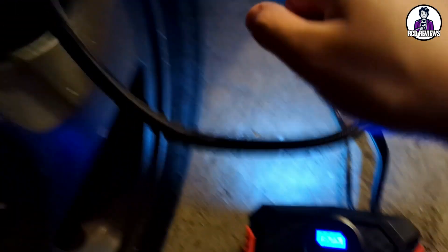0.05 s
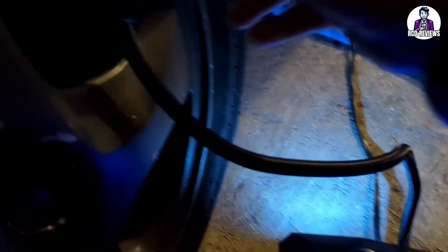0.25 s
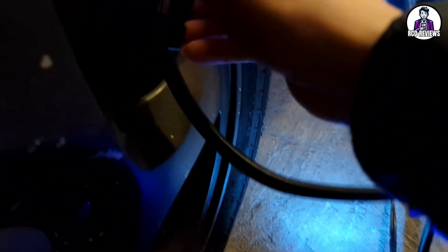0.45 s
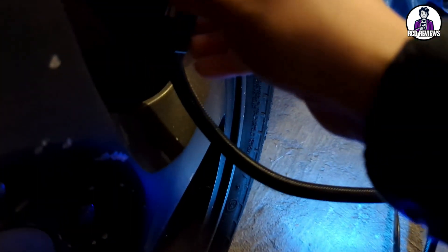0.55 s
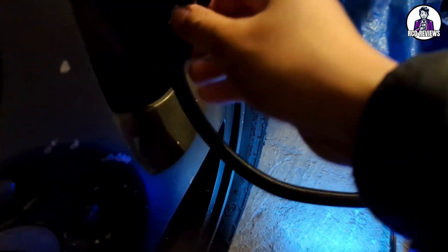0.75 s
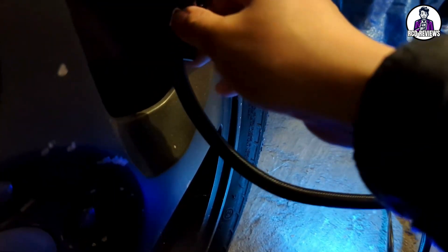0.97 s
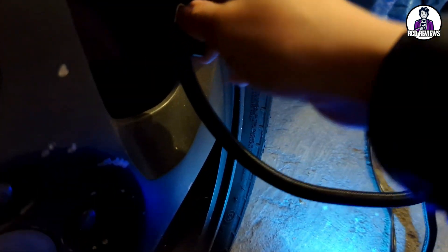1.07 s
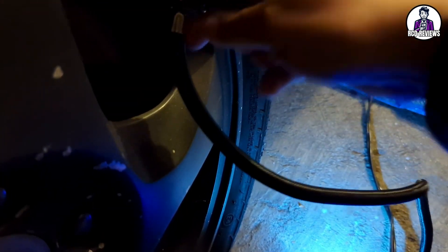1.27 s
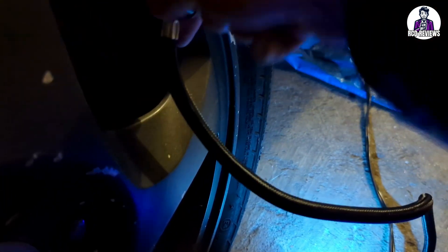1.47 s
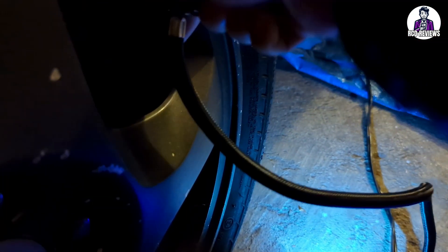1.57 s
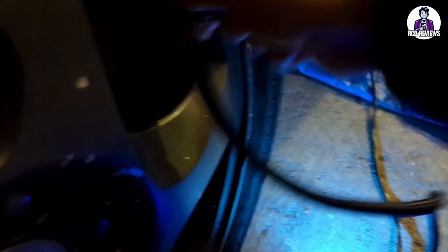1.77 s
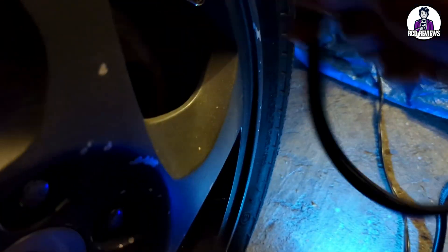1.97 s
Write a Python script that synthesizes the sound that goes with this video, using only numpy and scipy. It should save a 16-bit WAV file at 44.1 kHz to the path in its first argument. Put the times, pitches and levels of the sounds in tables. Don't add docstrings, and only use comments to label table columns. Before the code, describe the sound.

A sharp hiss of air escaping a tire valve for half a second, then small metallic clicks

```python
import sys
import numpy as np
from scipy import signal
from scipy.fft import rfft, irfft, next_fast_len
from scipy.io import wavfile
from scipy.ndimage import uniform_filter1d, map_coordinates

SR = 44100
rng = np.random.default_rng(int(sys.argv[2]) if len(sys.argv) > 2 else 0)


def attenuation_scalar(level_db):
    decades = np.asarray(level_db, float) / 20
    return 10 ** decades


def to_wav(s):
    ch = np.atleast_2d(s).T
    pcm = np.round(np.clip(ch, -1, 1) * 32767)
    wavfile.write(sys.argv[1], SR, pcm.astype(np.int16))


N = 89037
T = np.arange(N) / SR
HIT_T = np.arange(SR // 2) / SR


def unit(x):
    return x / np.sqrt(np.mean(x ** 2) + 1e-20)


def along(points, hz):
    f, v = np.transpose(points)
    return np.interp(np.log(hz + 1), np.log(f + 1), v)


def humps(table, hz):
    return sum(db / (1 + (2 * (hz - c) / w) ** 2) for c, w, db in table)


def wobble(rate):
    return map_coordinates(rng.standard_normal(int(N * rate / SR) + 4), [T * rate])


def filtered(x, response):
    m = next_fast_len(N + 8192)
    return irfft(rfft(x, m) * response(np.fft.rfftfreq(m, 1 / SR)), m)[..., :N]


def bandpass(x, low_hz, high_hz):
    sos = signal.butter(N=2, Wn=[low_hz, high_hz], btype="bandpass", fs=SR, output="sos")
    return signal.sosfilt(sos, x)


def patchy(depth_db, channels):
    z = signal.stft(rng.standard_normal((channels, N)), nperseg=256)[2]
    field = uniform_filter1d(rng.standard_normal(z.shape), 4, 1)
    field = uniform_filter1d(field, 10, 2)
    return signal.istft(z * attenuation_scalar(depth_db * unit(field)), nperseg=256)[1][:, :N]


def pair(left_db):
    return attenuation_scalar(np.array([[left_db / 2], [-left_db / 2]]))


def add_hit(out, s, sound):
    out[:, round(s * SR):][:, :len(HIT_T)] += sound


def turbulent_air():
    right_lag_s, alike = 0.00012, 0.38
    near, other = patchy(2.2, channels=2)
    late = filtered(near, lambda hz: np.exp(-2j * np.pi * hz * right_lag_s))
    return np.array([near, alike * late + np.sqrt(1 - alike ** 2) * other])


def behind_hand(right):
    # (frequency [Hz], width [Hz], gain [dB])
    far_side = [(4100, 200, -9), (6400, 400, 3), (7600, 800, -3), (8600, 1000, -6), (9800, 300, -3),
                (10600, 700, 2), (11700, 600, -4), (13200, 900, 1)]
    # (frequency [Hz], share of the shading, below 0 it strengthens)
    shadow = [(500, -.3), (1300, -.2), (2400, .2), (4400, .45), (8000, 1), (15000, .95)]
    # (time [s], shading of the right port [dB])
    hand = [
        (1.23, 7),
        (1.36, 7),
        (1.4, 5.5),
        (1.47, 6),
        (1.5, 10),
        (1.68, 12),
        (1.73, 11),
        (1.77, 4),
    ]
    open_db, shaded_db = 5, 13
    right = filtered(right, lambda hz: attenuation_scalar(humps(far_side, hz)))
    open_side = filtered(right, lambda hz: attenuation_scalar(-open_db * along(shadow, hz)))
    shaded = filtered(right, lambda hz: attenuation_scalar(-shaded_db * along(shadow, hz)))
    passed = attenuation_scalar(-np.interp(T, *np.transpose(hand)))
    share = (passed - attenuation_scalar(-shaded_db)) / (attenuation_scalar(-open_db) - attenuation_scalar(-shaded_db))
    share = np.clip(share, 0, 1.3)
    return share * open_side + (1 - share) * shaded


def jet():
    # (time [s], flow [dB], gap width [dB])
    leak = [
        (1.224, -70, 7),
        (1.234, -25.5, -4.5),
        (1.265, -26.5, -37),
        (1.4, -26, -21),
        (1.55, -27.5, -9),
        (1.7, -25.5, -18),
        (1.767, -29.5, -1.5),
        (1.798, -46, 5),
        (1.83, -88, -20),
    ]
    # (frequency [Hz], level per Hz [dB])
    hiss = [(180, -43), (300, -33.5), (1210, -23.5), (3840, -11), (4610, -7), (8510, 0), (10000, -3),
            (11800, 0.5), (15700, -4.5)]
    # (frequency [Hz], width [Hz], gain [dB])
    stem = [(950, 108, 8), (4097, 50, 15.5), (4450, 500, -10.5), (5800, 1140, -7), (6100, 200, 3),
            (8140, 100, 4), (8700, 390, 6), (10100, 230, -5), (11740, 270, 6)]
    # (frequency [Hz], level per Hz [dB])
    wide_gap = [(1500, -120), (2300, -9.5), (3750, 7.5), (4600, 4.5), (5600, 0.5), (6500, 9.5), (7200, -11),
                (8000, -120)]
    s, flow_db, gap_db = np.transpose(leak)
    flow = attenuation_scalar(np.interp(T, s, flow_db, left=-120, right=-120) + 6)
    air = turbulent_air()
    fine = unit(filtered(air, lambda hz: attenuation_scalar(along(hiss, hz) + humps(stem, hz))))
    wide = unit(filtered(air, lambda hz: attenuation_scalar(along(wide_gap, hz))))
    wide = wide * attenuation_scalar(np.interp(T, s, gap_db) - 8)
    left, right = (fine + wide) * flow
    return np.array([left, behind_hand(right)])


def ticks():
    # (time [s], level [dB], frequency [Hz], time to fall 60 dB [s], left over right [dB])
    touches = [
        (0.124, -48, 10800, 0.0072, 8),
        (1.02, -52.5, 11100, 0.0045, 14),
        (1.184, -50, 11300, 0.0068, 16),
        (1.886, -21.5, 11600, 0.0049, 6),
        (1.8983, -27.5, 11000, 0.015, -18),
        (1.9034, -22.5, 11800, 0.021, 5.5),
        (1.9075, -25, 10300, 0.013, 13.5),
        (1.9103, -34, 11000, 0.011, -10),
    ]
    out = np.zeros((2, N + SR))
    for s, db, hz, t60, left_db in touches:
        grit = rng.standard_normal((2, len(HIT_T))) * attenuation_scalar(-60 * HIT_T / t60)
        bright = bandpass(grit, 0.77 * hz, min(1.18 * hz, 20000))
        body = attenuation_scalar(-11) * bandpass(grit, 1200, 3800)
        add_hit(out, s, attenuation_scalar(db) * pair(left_db) * (bright + body))
    return out[:, :N]


def knocks():
    # (time [s], level [dB], frequency [Hz], time to fall 60 dB [s], left over right [dB])
    bumps = [(.003, -56.5, 483, 0.077, 1), (0.1, -52, 487, 0.044, 6), (0.397, -58, 1100, 0.028, -2),
             (1.038, -68.5, 1530, 0.025, 3), (1.13, -64, 1590, 0.052, 6), (1.138, -51, 119, 0.093, -2),
             (1.23, -23.5, 480, 0.005, 6), (1.246, -38, 53.7, 0.21, 7), (1.265, -39.5, 122, 0.047, 12),
             (1.603, -37.5, 417, 0.0093, -31.5), (1.625, -36, 80, 0.04, -22.5),
             (1.636, -42, 950, 0.029, -27), (1.6435, -28, 1620, 0.0079, -18),
             (1.682, -44.5, 573, 0.019, -23), (1.9, -46.5, 1053, 0.019, 20), (1.955, -45.5, 361, 0.046, 1)]
    out = np.zeros((2, N + SR))
    for s, db, hz, t60, left_db in bumps:
        fade = attenuation_scalar(db - 60 * HIT_T / t60)
        soft_start = 1 - np.exp(-3 * hz * HIT_T)
        swing = np.sin(2 * np.pi * hz * HIT_T)
        add_hit(out, s, fade * pair(left_db) * swing * soft_start)
    return out[:, :N]


def wheel():
    # (time [s], level [dB])
    blows = [
        (1.899, -54),
        (1.907, -47.5),
    ]
    # (frequency [Hz], level [dB], time to fall 60 dB [s])
    pitches = [(518.7, 3.5, 0.35), (974, -10, 0.091), (1684, -11.5, 0.25), (147, -9.5, 0.12),
               (308, -8, 0.23)]
    sag, sag_s = 0.057, 0.029
    settle = HIT_T + sag * sag_s * (1 - np.exp(-HIT_T / sag_s))
    ring = 0
    for hz, db, t60 in pitches:
        ring = ring + attenuation_scalar(db - 60 * HIT_T / t60) * np.sin(2 * np.pi * hz * settle)
    out = np.zeros((2, N + SR))
    for s, db in blows:
        add_hit(out, s, attenuation_scalar(db) * pair(-3.1) * ring)
    return out[:, :N]


def rub_band(grit, c):
    width_hz = 800

    def response(hz):
        peak = 1j * hz * width_hz / (c * c - hz * hz + 1j * hz * width_hz)
        return peak * np.exp(-(hz / (2 * c)) ** 4)

    return unit(filtered(grit, response))


def rubs():
    # (time [s], length [s], level [dB], start frequency [Hz], end frequency [Hz])
    strokes = [
        (1.129, 0.15, -64, 1110, 1500),
        (1.616, 0.0585, -43.5, 417, 1420),
        (1.637, 0.052, -41, 1480, 2130),
    ]
    out = np.zeros((2, N))
    for s, length, db, from_hz, to_hz in strokes:
        u = np.clip((T - s) / length, 0, 1)
        grit = rng.standard_normal((2, N)) * attenuation_scalar(4.5 * wobble(400))
        low, high = rub_band(grit, from_hz), rub_band(grit, to_hz)
        press = np.clip(np.minimum(30 * u, 6 * (1 - u)), 0, 1)
        out += attenuation_scalar(db) * press * ((1 - u) * low + u * high)
    return out * pair(-10)


def sleeve():
    # (time [s], rustle level [dB])
    rustle = [(0, -66.5), (.12, -69), (.24, -71.5), (.36, -67), (0.479, -71), (.54, -79.5), (.63, -76.5),
              (.72, -82), (.82, -78.5), (.9, -85.5), (1.1, -84), (1.2, -72.5), (1.8, -72), (1.86, -64),
              (1.919, -61.5), (2.02, -70.5)]
    # (frequency [Hz], level per Hz [dB])
    cloth_tone = [(120, -16), (200, -2.5), (400, -7), (800, -9), (1630, -10), (7400, -20.5), (11700, -21.5),
                  (15700, -20)]
    bright_from_hz, bright_grows, bright_db = 6500, 0.9, -72
    level_db = np.interp(T, *np.transpose(rustle))
    cloth = unit(filtered(patchy(1.17, channels=2), lambda hz: attenuation_scalar(along(cloth_tone, hz))))
    dull = filtered(cloth, lambda hz: 1 / (1 + (hz / bright_from_hz) ** 4))
    bright = (cloth - dull) * attenuation_scalar(bright_grows * np.minimum(level_db - bright_db, 0))
    lumps_db = 1.2 * wobble(39.46)
    return (dull + bright) * attenuation_scalar(level_db + 5 + lumps_db) * pair(-3.5)


def yard(x):
    # (frequency [Hz], time to fall 60 dB [s])
    echo_t60 = [(1000, 0.48), (4000, .35), (12000, 0.23)]
    hz, t, z = signal.stft(rng.standard_normal((2, SR // 2)), SR, nperseg=256)
    fade = attenuation_scalar(-60 * t / along(echo_t60, hz)[:, None])
    tail = signal.istft(z * fade, SR, nperseg=256)[1]
    tail = tail / np.linalg.norm(tail[0])
    return signal.fftconvolve(x.mean(0)[None], tail, axes=1)[:, :N]


def road():
    # (frequency [Hz], level per Hz [dB])
    road_tone = [(15, -48), (30, -12.5), (60, -0.5), (130, -6.5), (220, -20), (420, -26), (900, -42),
                 (9000, -66)]
    a, b = patchy(1, channels=2)
    side = filtered(b, lambda hz: along([(60, 0.2), (300, 0.12), (900, 0.84)], hz))
    rumble = unit(filtered(np.array([a + side, a - side]), lambda hz: attenuation_scalar(along(road_tone, hz))))
    drone_hz = 55 + 5.45 * wobble(10)
    drone = attenuation_scalar(-2 + wobble(5.2)) * np.sin(2 * np.pi * np.cumsum(drone_hz) / SR)
    level_db = -67 - 2 * np.tanh(3 * (T - 0.6))
    return (rumble + drone) * attenuation_scalar(level_db) * pair(-1.7)


def scene():
    air = jet()
    taps = ticks() + knocks() + wheel()
    echo = attenuation_scalar(-12) * pair(6.9) * yard(air + attenuation_scalar(-5) * taps)
    return air + taps + echo + rubs() + sleeve() + road()


def band_limit(x):
    return signal.sosfilt(signal.butter(12, 16870, fs=SR, output="sos"), x)


def record(dry):
    top_hz, bass_hz = 15750, 36

    def limits(hz):
        treble = np.clip((top_hz - hz) / 60, 0, 1) + 0.0003
        return treble / (1 + (bass_hz / (hz + 1)) ** 6)

    return band_limit(filtered(dry, limits))


dry = scene()
out = record(dry)
to_wav(out)
```